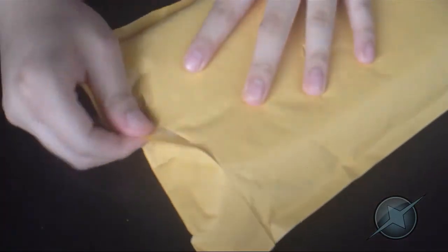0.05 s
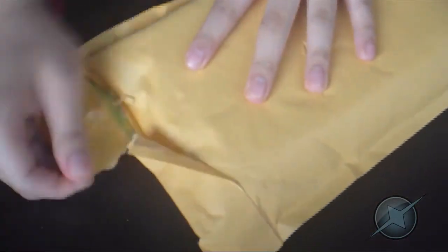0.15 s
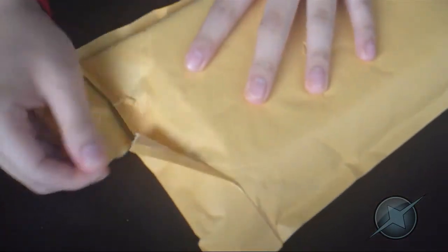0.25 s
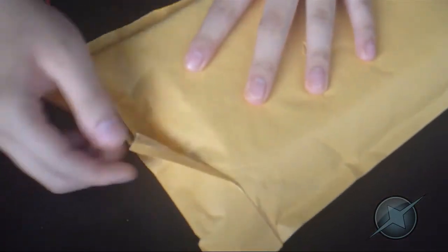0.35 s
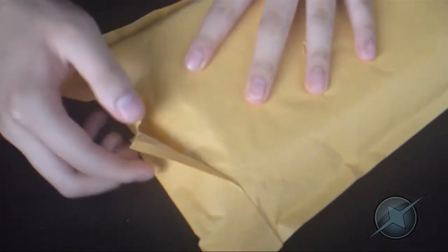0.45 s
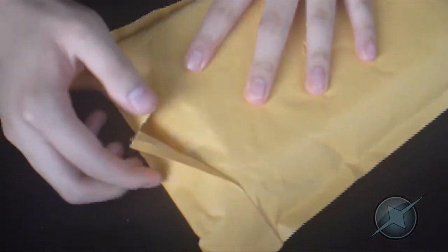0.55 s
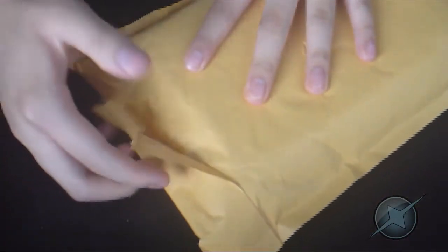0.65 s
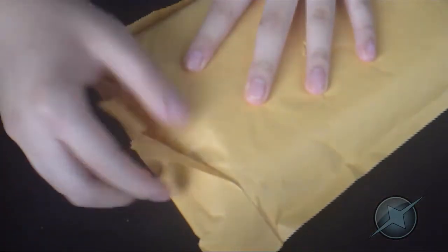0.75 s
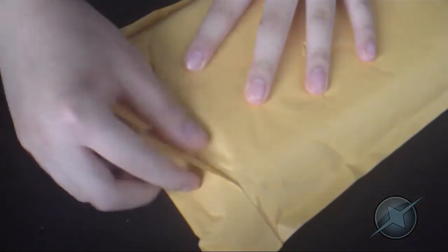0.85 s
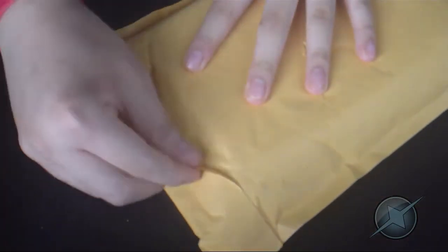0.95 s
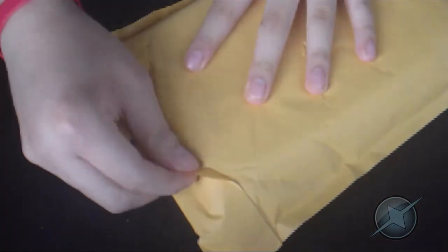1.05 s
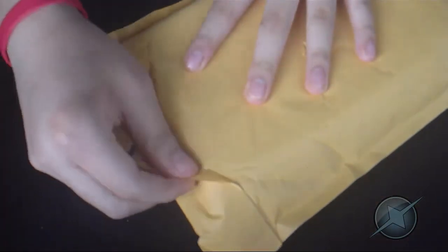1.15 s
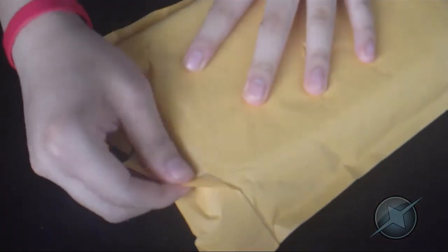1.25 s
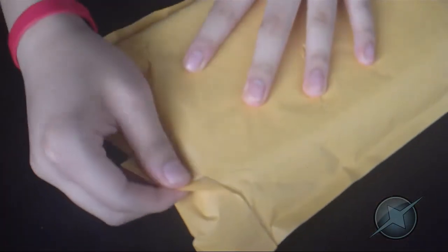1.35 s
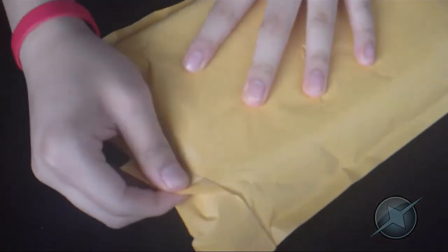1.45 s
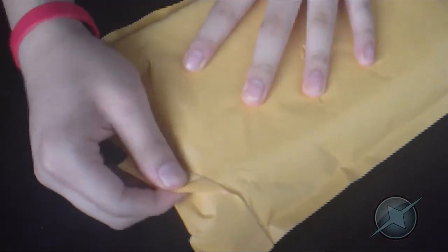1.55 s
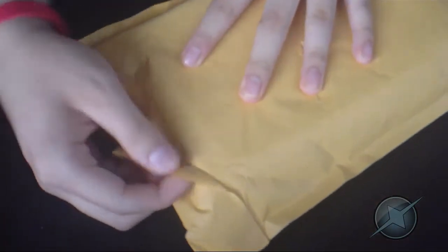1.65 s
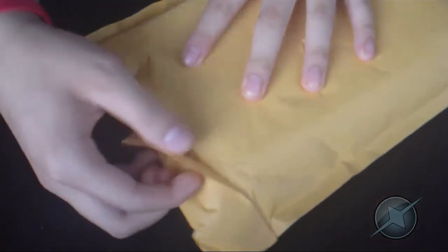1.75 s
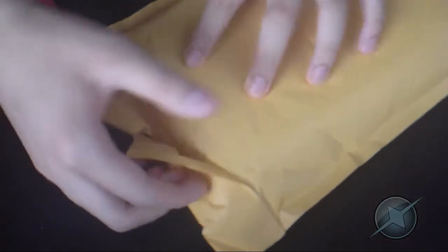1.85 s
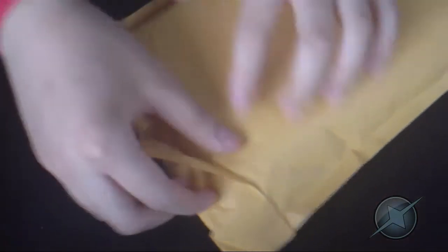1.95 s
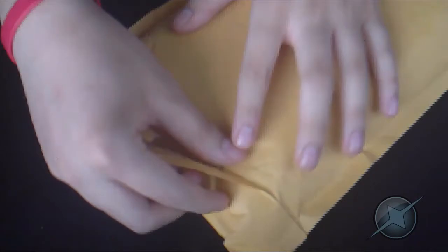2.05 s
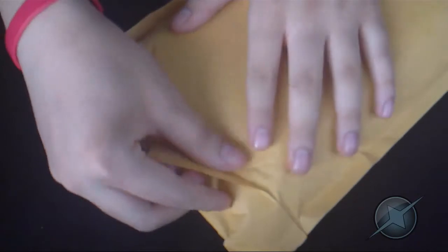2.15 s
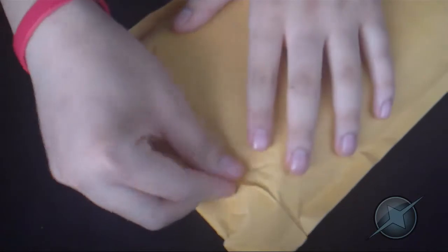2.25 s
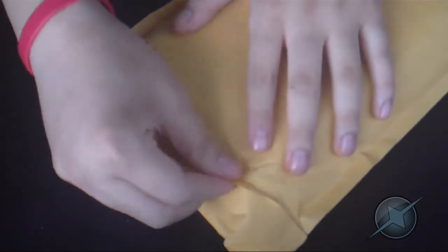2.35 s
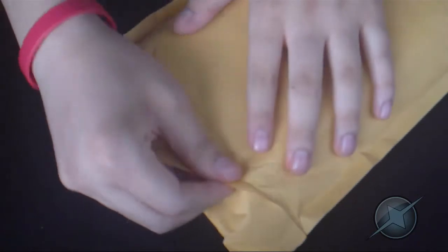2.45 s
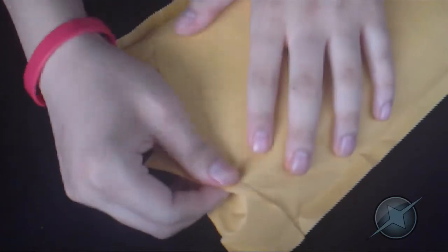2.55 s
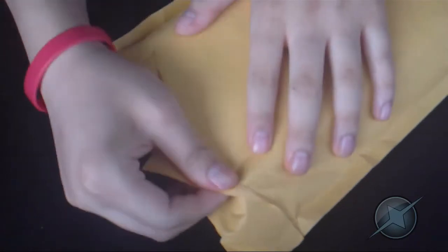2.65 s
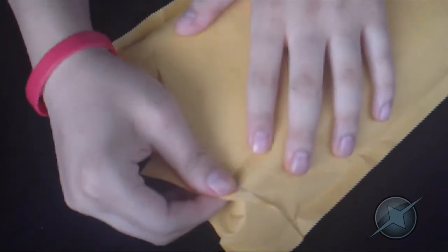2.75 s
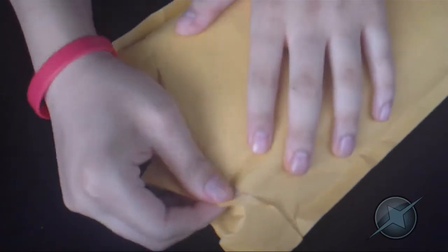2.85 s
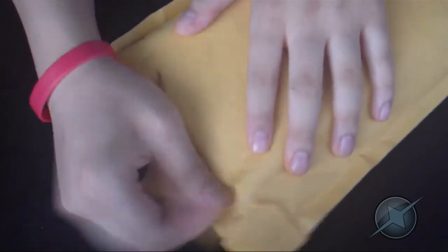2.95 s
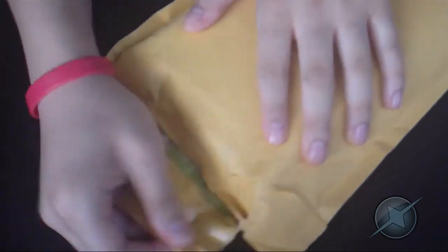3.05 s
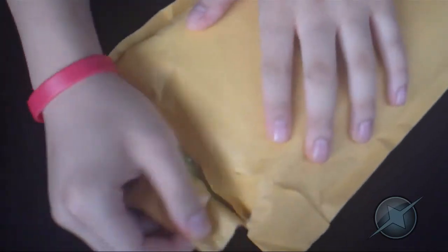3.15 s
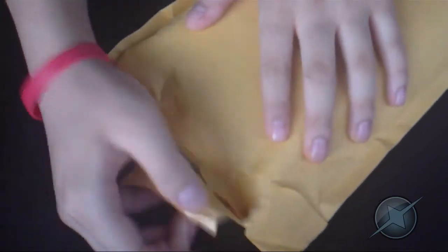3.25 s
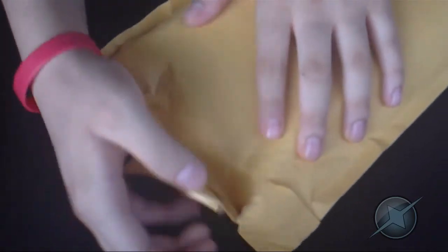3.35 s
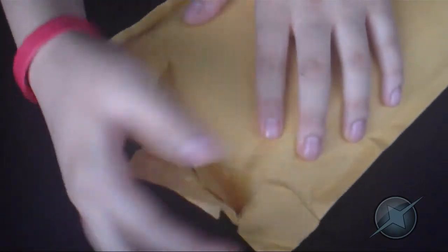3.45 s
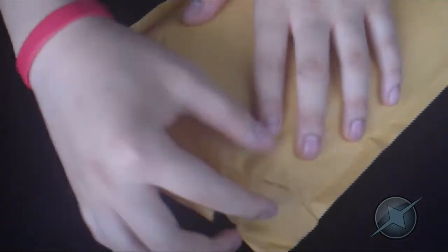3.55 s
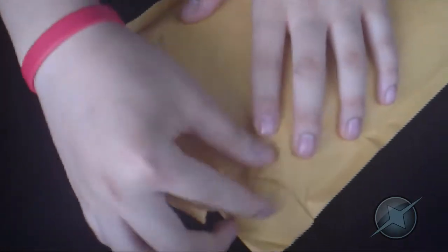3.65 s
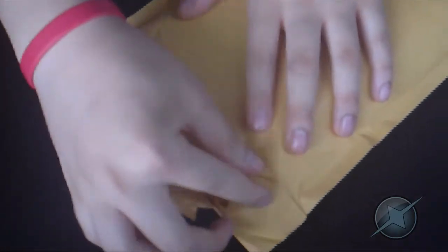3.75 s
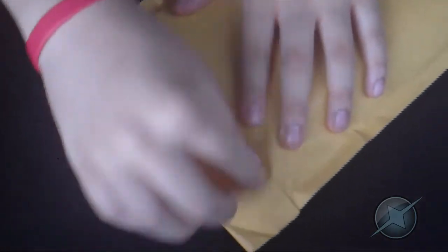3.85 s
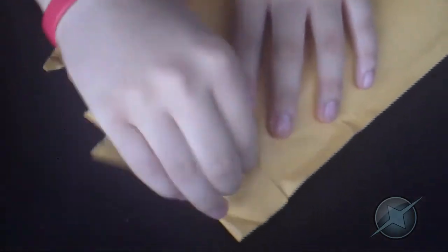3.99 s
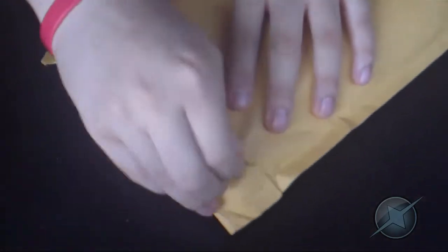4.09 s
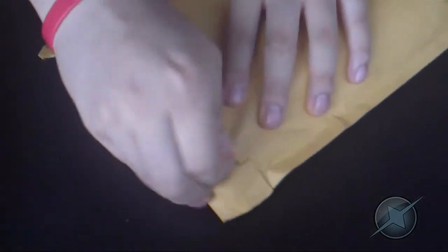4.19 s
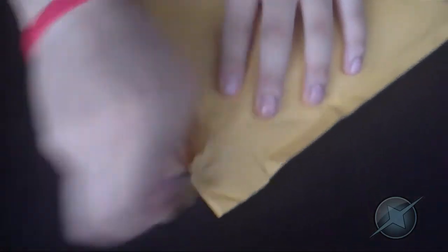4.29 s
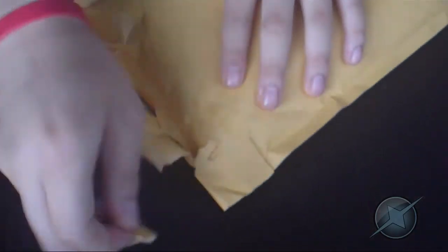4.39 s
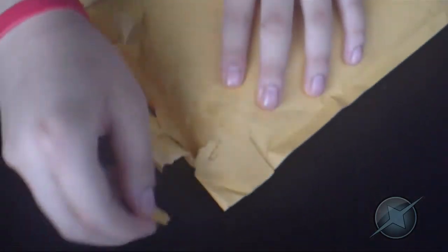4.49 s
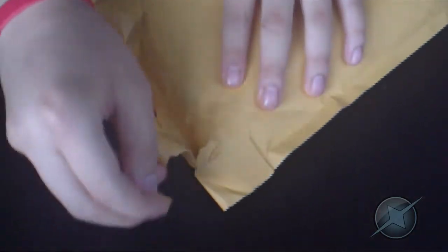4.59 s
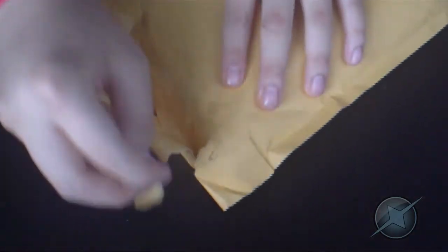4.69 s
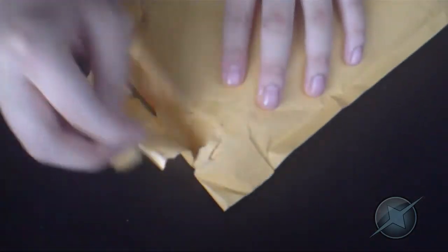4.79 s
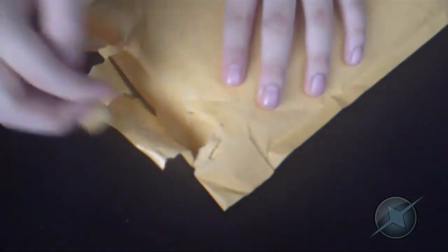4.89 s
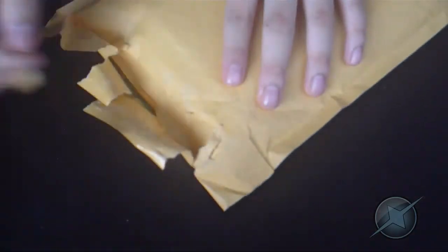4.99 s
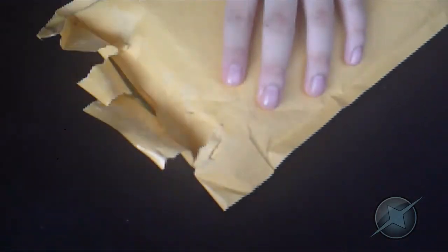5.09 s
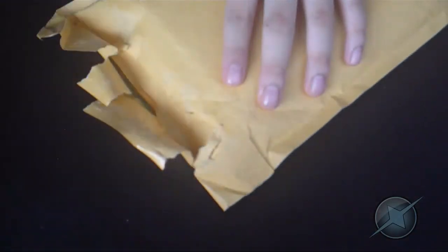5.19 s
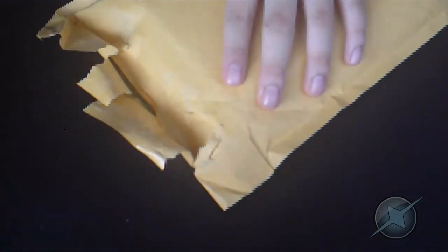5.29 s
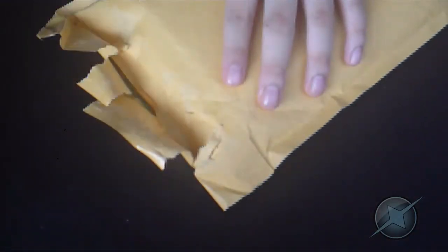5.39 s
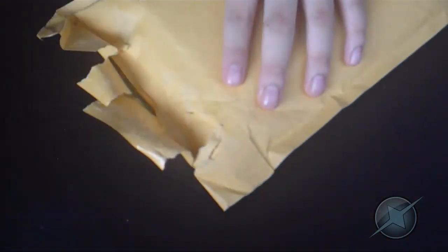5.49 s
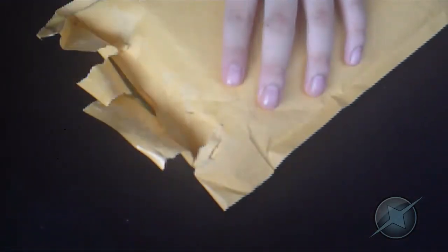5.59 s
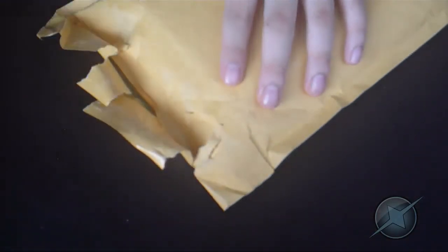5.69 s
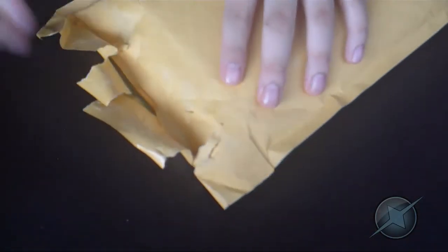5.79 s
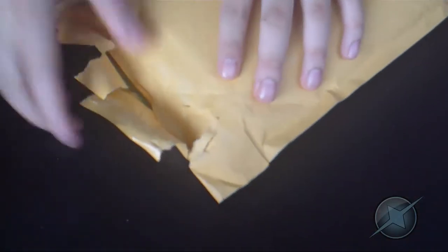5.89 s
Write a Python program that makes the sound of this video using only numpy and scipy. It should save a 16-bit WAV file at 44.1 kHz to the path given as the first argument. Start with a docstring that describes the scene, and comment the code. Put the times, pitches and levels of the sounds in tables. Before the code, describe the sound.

Close to a small microphone in a quiet room, hands tear a padded paper envelope on a desk. A loud rip comes almost at once, then hollow pops, bright snaps and fibre crackle in uneven bouts. Two more hard rips follow around the middle and later, with dull desk thuds. After that, only low hum and soft hiss, with a tiny late crinkle.

```python
"""Padded envelope torn open

A hand tears the flap of a padded paper envelope on a desk in a quiet room, close to a small microphone.
Creases snap: a short hollow pop, a decaying sine that rings the hollow, and a bright crack of noise.
Random clicks make fine fibre crackle, and three fast rips are dense bursts of it. Struck desk modes thud.
Low hum, a steadier tone, hiss and desk rumble lie below; the loudest snaps overload the microphone."""
import sys
import numpy as np
from scipy import signal
from scipy.fft import rfft, irfft
from scipy.io import wavfile

SR = 44100
rng = np.random.default_rng(int(sys.argv[2]) if len(sys.argv) > 2 else 0)


def decibels_to_gain(level_db):
    """Convert a level in decibels to a linear amplitude gain (20 dB per decade)."""
    exponent = np.asarray(level_db, float) / 20
    return 10 ** exponent


def pcm_store(signal):
    """Save signal as 16-bit PCM."""
    levels = np.round(np.clip(np.atleast_2d(signal), -1, 1) * 32767)
    wavfile.write(sys.argv[1], SR, levels.astype(np.int16).T)


N = 261513   # samples


def rms_one(x):
    """Scales to rms 1."""
    return x / np.sqrt(np.mean(x ** 2) + 1e-20)


def colour(x, spectrum):
    """Minimum-phase filter of a spectrum, so nothing sounds before its cause; keeps the power of white noise."""
    hz, db = np.transpose(spectrum)
    grid = np.maximum(np.arange(1025) * SR / 2048, 1)
    cepstrum = irfft(np.log(decibels_to_gain(np.interp(np.log(grid), np.log(hz), db))))
    # folding the cepstrum onto positive time gives minimum phase
    cepstrum[1:1024] *= 2
    cepstrum[1025:] = 0
    kernel = irfft(np.exp(rfft(cepstrum)))
    return signal.fftconvolve(x, kernel / np.sqrt(np.sum(kernel ** 2)))[:N]


def resonance(x, hz, width_hz):
    """Two-pole resonance with gain 1 on top."""
    r = np.exp(-np.pi * width_hz / SR)
    zeros = [(1 - r * r) / 2, 0, (r * r - 1) / 2]
    poles = [1, -2 * r * np.cos(2 * np.pi * hz / SR), r * r]
    return signal.lfilter(zeros, poles, x + 1e-18)


def drift(rate_hz):
    """Slow random wander of rms 1: noise through two equal low-pass poles."""
    r = np.exp(-2 * np.pi * rate_hz / SR)
    wander = signal.lfilter([1], [1, -2 * r, r * r], rng.standard_normal(N + SR))
    return rms_one(wander[SR:])   # the first second lets the filter settle


# low hum bands: (f/Hz, width of each of two passes/Hz, rms level/dB)
HUM_BANDS = [(32, 49, -45), (62.8, 10.7, -47.5), (129.6, 58, -49), (847, 7.4, -92)]


def hum():
    """Wavering hum of distant machines: noise passed twice through each narrow resonance."""
    total = np.zeros(N)
    for hz, width_hz, db in HUM_BANDS:
        once = resonance(rng.standard_normal(N), hz, width_hz)
        total += decibels_to_gain(db) * rms_one(resonance(once, hz, width_hz))
    return total


def whine():
    """One steadier tone of distant machines: a sine whose pitch and level waver a little."""
    hz = 218.3 + 2.0 * drift(13.4)
    level = decibels_to_gain(-51.5 + 0.48 * drift(4.2))   # rms
    return level * np.sqrt(2) * np.sin(2 * np.pi * np.cumsum(hz) / SR)


# shape of the room hiss: (f/Hz, relative level per Hz/dB)
AIR_SPECTRUM = [(140, -44), (240, -5.5), (369, -6.5), (395, -4.5), (997, -9), (1090, -9), (1790, -12.5),
                (13500, -24.5), (14500, -10.5)]


def air():
    """Smooth room hiss: coloured noise at a steady rms level."""
    return decibels_to_gain(-48) * colour(rng.standard_normal(N), AIR_SPECTRUM)


# low modes of the desk, rubbed and struck: (f/Hz, relative level/dB, t60 when struck/s)
DESK_MODES = [(70.4, -1, 0.031), (149, 3.5, 0.082), (245.5, 1.5, 0.073), (370.4, 0.5, 0.081)]


def rumble(crinkle_db):
    """Hands pressing the desk keep its low modes murmuring, more so while the sheet is worked."""
    press_db, press_follows, waver_db = -46, 0.35, 0.5   # rms at a -28.5 dB crinkle; share of its swing; waver
    noise = rng.standard_normal(N)
    # wider resonances than when struck
    low = sum(decibels_to_gain(db) * resonance(noise, hz, 3.68 / t60_s) for hz, db, t60_s in DESK_MODES)
    swing_db = np.maximum(crinkle_db, -60) + 28.5
    return decibels_to_gain(press_db + press_follows * swing_db + waver_db * drift(14.0)) * rms_one(low)


# the envelope slaps the desk: (t/s, relative level/dB)
KNOCKS = [(0.206, -27.5), (0.6775, -25), (0.7, -26), (1.711, -32), (1.8523, -18), (2.0263, -31.5),
          (2.8221, -32.5), (2.964, -31), (3.0413, -13), (3.347, -34), (3.455, -11), (4.311, -22.5),
          (4.3451, -18.5)]


def knocks(thud_db):
    """Each slap strikes the desk modes with strengths of its own, through a soft, dull contact."""
    s, db = np.transpose(KNOCKS)
    strengths_db = rng.normal(0, 1.5, (len(KNOCKS), len(DESK_MODES)))
    blows = np.zeros((len(DESK_MODES), N))
    blows[:, (s * SR).astype(int)] = decibels_to_gain(db + thud_db + strengths_db.T)
    thuds = np.zeros(N)
    for blow, (hz, mode_db, t60_s) in zip(blows, DESK_MODES):
        # the factor undoes the low impulse gain of a narrow resonance
        thuds += decibels_to_gain(mode_db) * SR * t60_s / 6.9 * resonance(blow, hz, 2.2 / t60_s)
    return signal.lfilter([.03], [1, -.97], thuds)


def strokes(rows, rise_db_per_s, sag_db_per_s, fall_db_per_s):
    """Each stroke rises, sags while it lasts and falls away; gives deep body, body, lower and upper treble in dB."""
    grit_db, grit_follows = -5.5, 0.44   # lower treble re body; share of the brightness it follows
    t = np.arange(0, N + 32, 32) / SR
    power = np.full((4, 1), 1e-10)
    for s, length, db, bright_db, hollow_db in rows:
        rise = rise_db_per_s * np.maximum(s - t, 0)
        sag = sag_db_per_s * np.clip(t - s, 0, length)
        fall = fall_db_per_s * np.maximum(t - s - length, 0)
        bands_db = np.array([[hollow_db], [0], [grit_db + grit_follows * bright_db], [bright_db]])
        power = power + decibels_to_gain(2 * (db - rise - sag - fall + bands_db))
    return [np.interp(np.arange(N) / SR, t, 10 * np.log10(p)) for p in power]


def grains(per_s, spread_db, clump_db):
    """Random clicks of very uneven size that come in clumps; power 1 on average."""
    sizes = decibels_to_gain(spread_db * np.minimum(rng.exponential(1, N), 4.0)) * rng.choice([-1, 1], N)
    chance = per_s * decibels_to_gain(clump_db * drift(30.0)) / SR
    return rms_one(sizes * (rng.random(N) < chance))


# resonances of the envelope's hollow: (f/Hz, width/Hz, relative level/dB)
HOLLOW = [(512, 94, -1.5), (771, 95, 0.5), (1180, 350, -1.5), (1340, 125, 4), (1650, 433, -4),
          (1964, 306, -1.5), (3100, 275, -14)]


def hollow(clicks, deep_db, body_db):
    """Each click rings one resonance of the hollow strongly, the others weakly; deep ones open with the pocket."""
    dealt = rng.integers(0, len(HOLLOW), N)
    rings, levels = [], []
    for k, (hz, width_hz, db) in enumerate(HOLLOW):
        share = np.where(dealt == k, 1, .4)
        rings.append((-1) ** k * decibels_to_gain(db) * resonance(clicks * share, hz, width_hz))
        levels.append(decibels_to_gain(deep_db if hz < 1000 else body_db))
    return sum(level * ring for level, ring in zip(levels, rings)) / np.std(sum(rings))


# breaking fibres as the microphone hears them: (f/Hz, relative level per Hz/dB)
TREBLE = [(1410, -8), (2400, 1), (2830, 4), (3080, -0.5), (4350, -3.5), (5020, 2), (6060, -3.5),
          (7590, -1.5), (8180, 0), (10400, -11), (11900, -16), (13600, -12), (14500, -5.5)]


def fibres(deep_db, body_db, low_treble_db, high_treble_db, per_s, spread_db, clump_db):
    """Breaking fibres: clicks ring the hollow; each also ticks in the treble, mostly in one band, over a fine fizz."""
    fizz_share, rub_share = 1.58, 0.58   # fine fizz in the treble and in the hollow
    clicks = grains(per_s, spread_db, clump_db)
    fizz = grains(5000.0, 0.83, 3.0)
    split_hz = 6300   # between lower and upper treble
    edges_hz = [1500, 2700, 4200, split_hz, 8600, 11500, 15500]
    dealt = rng.integers(0, len(edges_hz) - 1, N)
    halves = np.zeros((2, N))
    for k, (low_hz, high_hz) in enumerate(zip(edges_hz, edges_hz[1:])):
        ticks = 1.8 * clicks * np.where(dealt == k, 1, .25)
        ticks += fizz_share * decibels_to_gain(0.95 * drift(13.0)) * fizz
        band = signal.butter(2, [low_hz, high_hz], "band", fs=SR, output="sos")
        halves[int(low_hz >= split_hz)] += signal.sosfilt(band, ticks)
    low, high = (rms_one(colour(half, TREBLE)) for half in halves)
    body = hollow(clicks + rub_share * fizz, deep_db, body_db)
    return body + decibels_to_gain(low_treble_db) * low + decibels_to_gain(high_treble_db) * high


# bouts of crinkling as the fingers work the sheet:
# (t/s, length/s, body level/dB, upper treble re body/dB, deep body re body/dB)
CRINKLES = [(0, 0.15, -34.5, -6, -1), (.1, .05, -41.5, 5.5, -7), (.14, 0.12, -24, -12, -3),
            (.305, 0.016, -33.5, -10, -1), (.42, 0.14, -34.5, -10.5, -4.5), (.61, 0.065, -33.5, -9, -6),
            (.667, 0.0067, -18, -16, 0.5), (.77, 0.079, -39.5, -20, 5.5), (.87, 0.078, -37, -4.5, -1),
            (.935, 0.041, -31.5, -8.5, 2), (1.015, .03, -44, -4, -4), (1.056, 0.012, -26.5, -3, 0.5),
            (1.09, 0.035, -31.5, -3, 1), (1.17, 0.097, -30, -8, -1.5), (1.3, .16, -34.5, -7, 1),
            (1.47, 0.069, -41.5, -0.5, -3), (1.62, 0.12, -34, -14, -4), (1.71, 0.15, -28, -7, -6),
            (1.854, 0.12, -30.5, -14, 0), (2.026, 0.072, -27, -18, -0.5), (2.14, 0.085, -40, -8, 3),
            (2.25, .05, -34.5, -21, 3), (2.296, 0.025, -25.5, -16, -2), (2.373, 0.054, -29.5, -26, 2.5),
            (2.44, 0.023, -31, -10.5, -7), (2.51, 0.013, -21, -21, -14), (2.575, .02, -28.5, -14, -6),
            (2.602, 0.019, -22, -20.5, -0.5), (2.76, 0.097, -30, -10, -3), (2.88, .04, -31, -7.5, -5),
            (2.928, 0.039, -24.5, -4, -1), (3.0, 0.036, -42, -0.5, -5), (3.09, 0.08, -35, -7, -5),
            (3.2, .1, -46, -1, -7), (3.31, 0.1, -29, -16, -1.5), (3.435, 0.041, -26.5, -20, -3.5),
            (3.5, 0.068, -39, -8, -1), (3.6, .06, -47.5, -8, 2), (3.67, 0.038, -32.5, -11, -1.5),
            (3.755, 0.057, -33, -10, -1.5), (3.875, 0.34, -33, -14, -6), (4.1, 0.088, -30, -7.5, -4),
            (4.225, 0.16, -32.5, -3.5, -1), (4.38, .03, -32.5, -6, -1), (4.44, 0.079, -46.5, -5, -3),
            (4.56, 0.1, -51.5, -5, -1), (4.725, 0.044, -43.5, -6, 0.5), (4.82, 0.041, -39.5, -7, -5),
            (5.843, 0.098, -40.5, -12, -5)]


def crinkle_levels():
    """Levels in dB of the four bands as the fingers work the sheet in bouts."""
    return strokes(CRINKLES, rise_db_per_s=1100, sag_db_per_s=19, fall_db_per_s=272)


def crinkles(levels_db):
    """Fine fibre crackle that fills the gaps between the snaps."""
    return fibres(*levels_db, per_s=900.0, spread_db=1.5, clump_db=6.0)


# fast rips: (t/s, length/s, body level/dB, upper treble re body/dB, deep body re body/dB)
RIPS = [(.156, 0.067, -10, -7, 0.5), (3.042, 0.042, -11, -7, -12.5), (4.311, 0.061, -9.5, -6, -3)]


def rips():
    """Dense tearing of many fibres, practically silent outside each stroke."""
    levels_db = strokes(RIPS, rise_db_per_s=4000, sag_db_per_s=57, fall_db_per_s=1200)
    return fibres(*levels_db, per_s=1100.0, spread_db=3.0, clump_db=5.0)


# creases snapping: (t/s, relative level/dB, pop f/Hz, crack re snap level/dB, crack f/Hz)
SNAPS = [(.1564, 4, 1930, -12, 7700), (.1641, -11, 1230, -17, 7600), (.1748, 1.5, 1110, -7, 9100),
         (.1873, 0, 1650, -5, 5150), (.1952, -2, 1430, -7.5, 7600), (.2067, -1, 1340, -7.5, 5800),
         (.2192, -4, 2060, -5, 5260), (.3046, -8, 1220, -28, 3000), (.4227, -33, 1460, -17, 5100),
         (.4694, -28, 1240, 10, 7250), (.5295, -17, 2180, -6.5, 5300), (.6485, -11, 1430, 1, 8300),
         (.6659, 3.5, 1650, -9.5, 5450), (.6749, 4, 780, -9.5, 7700), (.682, -2.5, 495, -14, 5300),
         (.8703, -23, 1110, -7, 7940), (.9738, -18, 820, -13, 8700), (1.0519, -16, 1260, 1.5, 5170),
         (1.0651, -13, 1750, -13, 5300), (1.128, -24, 1800, 6, 9050), (1.15, -28, 1400, 10.5, 5100),
         (1.1902, -9.5, 1610, -21, 9000), (1.2423, -19, 1340, -28, 7700), (1.25, -15.5, 1820, -27, 7200),
         (1.3368, -21, 1400, -1.5, 7300), (1.3588, -16.5, 1400, -8, 8450), (1.3673, -13.5, 1740, -8, 5170),
         (1.3826, -14, 1780, -25, 5300), (1.4129, -11, 1530, -16, 5500), (1.4254, -13, 1800, -20, 7500),
         (1.4347, -18, 1290, 0.5, 9400), (1.451, -22, 1140, -1.5, 9050), (1.6709, -18.5, 1420, -12, 7600),
         (1.7098, -4.5, 1430, -10, 2770), (1.7722, -18, 1300, -10, 7500), (1.81, -18.5, 1240, -7, 7700),
         (1.8534, 2, 1214, -9.5, 5340), (1.9479, -17, 1800, -10, 6750), (1.9587, -15, 1240, -24, 3100),
         (2.0103, -10, 750, -15, 7240), (2.0278, 6.5, 1770, -15.5, 7600), (2.0474, -9, 1180, -3.5, 7460),
         (2.1018, -11, 1000, -17, 7300), (2.144, -24, 1930, -24, 6800), (2.2865, -12.5, 1060, -19, 7600),
         (2.2957, -11, 1610, -8, 3200), (2.309, -7, 1300, -9.5, 5200), (2.3162, -2, 1180, -34.5, 7600),
         (2.3225, -15, 1150, -16, 7800), (2.3476, -6, 1170, -32, 7300), (2.3736, -4, 1110, -36, 2700),
         (2.3811, -6.5, 1260, -35, 2700), (2.3906, -6.5, 1160, -32, 3000), (2.3976, -14, 1180, -29, 7500),
         (2.4023, -10, 1180, -23, 7400), (2.4128, -13, 1270, -15, 7600), (2.4604, -11, 1790, -20, 3100),
         (2.5102, -3, 1080, -35, 2700), (2.5201, -2, 920, -8, 7800), (2.5553, -14, 1300, -6, 3320),
         (2.5836, -20, 1260, -16, 5400), (2.602, .5, 1760, -12.5, 4900), (2.6533, -7, 2000, -17, 2720),
         (2.726, -35.5, 1300, 4.5, 8000), (2.7353, -23.5, 1210, -9, 9200), (2.76, -5, 2170, -19, 2660),
         (2.7737, -26, 2160, -12, 3500), (2.8207, -4, 1750, -10.5, 5080), (2.8819, -15, 1890, -6, 9000),
         (2.9148, -17, 1730, 6, 7640), (2.9293, -5.5, 1720, 2.5, 7300), (2.966, -7.5, 1220, -3.5, 6700),
         (2.9742, -12.5, 1350, 2.5, 13300), (3.0185, -24, 1000, 4, 7600), (3.025, -13, 830, -3, 5370),
         (3.0418, 6, 1110, -6.5, 5040), (3.0571, 13, 2060, -36, 5300), (3.0615, 4, 2000, -20, 5300),
         (3.0805, -9, 735, -20, 5260), (3.082, 4, 2400, -23, 8300), (3.1444, -14, 1630, -11, 2700),
         (3.1737, -16.5, 2160, -21.5, 2700), (3.3251, -10, 1760, -12, 5200), (3.3359, -6, 1900, -9, 2780),
         (3.3427, -9.5, 1640, -9, 2760), (3.3989, -13.5, 1650, -26, 3300), (3.4424, -15, 1460, -19, 2700),
         (3.4548, 2.5, 1420, -11, 4800), (3.4625, 4, 1700, -17, 2870), (3.5359, -19, 1530, -2, 9100),
         (3.5583, -17, 1340, -4.5, 7800), (3.687, -11.5, 1280, -15, 7200), (3.7026, -10.5, 1300, -8, 2680),
         (3.7582, -19.5, 1340, -25, 3200), (3.8948, -19, 1300, -33, 5300), (3.9859, -19, 1550, -7, 8500),
         (4.1092, -10, 565, -7, 5040), (4.1259, -11.5, 1700, -12, 7400), (4.1586, -11.5, 1830, -11, 8400),
         (4.161, -17, 517, -20, 5200), (4.165, -10.5, 1680, -29, 7600), (4.177, -13.5, 522, -5, 5200),
         (4.1895, -16, 595, -3.5, 10700), (4.1985, -13.5, 1480, -8, 5270), (4.2361, -16.5, 1250, -20, 5000),
         (4.297, -17.5, 1300, -7, 5200), (4.3113, 2, 560, -10, 3900), (4.3437, -6, 1340, 2.5, 5800),
         (4.3708, -0.5, 1390, -2.5, 7560), (4.495, -41, 1400, 11, 5940), (4.7414, -29.5, 1440, 2.5, 6750),
         (4.8402, -21, 1490, -5, 6600), (4.8721, -31.5, 2000, 8.5, 7140), (5.701, -32.5, 445, -16, 6400),
         (5.9147, -21.5, 1740, -4.5, 5140)]


def snaps(pop_cycles, pop_db, crack_s, crack_db):
    """A crease flips: a pop of a few cycles with a noisy crack on its front, coloured by the size of the crease."""
    t = np.arange(1300) / SR
    pops, cracks = np.zeros((2, N + len(t)))
    noise = rng.standard_normal((len(SNAPS), len(t)))
    for k, (s, db, hz, crack_share_db, crack_hz) in enumerate(SNAPS):
        start = round(s * SR)
        at = slice(start, start + len(t))
        swell = (1 - np.exp(-t * hz * 4.13)) * decibels_to_gain(-60 * t * hz / pop_cycles)   # falls 60 dB in pop_cycles
        pops[at] += decibels_to_gain(db + pop_db) * swell * np.sin(2 * np.pi * hz * t)
        burst = noise[k] * np.exp(-t / crack_s)
        crack = 0.43 * burst + 1.08 * resonance(burst, crack_hz, 0.053 * crack_hz)
        cracks[at] += decibels_to_gain(db + crack_share_db + crack_db) * crack
    pops = pops[:N]
    ringing = sum(decibels_to_gain(db) * resonance(pops, hz, width_hz) for hz, width_hz, db in HOLLOW)
    return pops + 2.63 * ringing + colour(cracks, TREBLE)   # the hollow rings on


def room(x):
    """One early echo off a near surface and a short diffuse tail, slightly duller than the direct sound."""
    t60_s, tail_db, cut_hz = 0.26, -17, 17640
    echo_s, echo_db = .0095, -16
    t = np.arange(SR // 2) / SR
    tail = rng.standard_normal(len(t)) * decibels_to_gain(-60 * t / t60_s) * (1 - np.exp(-t / 0.00072))
    tail = signal.lfilter(*signal.butter(1, cut_hz, fs=SR), tail)
    tail *= decibels_to_gain(tail_db) / np.sqrt(np.sum(tail ** 2))
    tail[round(echo_s * SR)] += decibels_to_gain(echo_db)
    return x + signal.fftconvolve(x, tail)[:N]


def scene():
    """Paper in the room, over the background; one microphone, channels apart by a faint hiss and a slight waver."""
    levels_db = crinkle_levels()
    paper = crinkles(levels_db) + rips()
    paper += snaps(pop_cycles=6.8, pop_db=-5.0, crack_s=0.0033, crack_db=0.0)
    paper += knocks(thud_db=-6.0)
    body_db = levels_db[1]
    mid = room(paper) + rumble(body_db) + hum() + whine() + air()
    waver = decibels_to_gain(-37) * drift(40.0) * mid
    own_hiss = decibels_to_gain(-69.5) * rng.standard_normal(N)
    side = waver + own_hiss
    return np.array([mid + side, mid - side])


def low_pass(x):
    """Removes everything above the highest recorded frequency."""
    return signal.sosfilt(signal.butter(12, 15260, fs=SR, output="sos"), x)


def record(dry):
    """At the microphone the loudest snaps hit the ceiling; the deepest bass and the top are cut."""
    clipped = np.clip(dry, -.84, .84)
    low_cut = signal.butter(3, 62.5, "high", fs=SR, output="sos")
    top_cut = signal.cheby2(14, 60, 14650, fs=SR, output="sos")   # 60 dB down from 14650 Hz up
    mix = signal.sosfilt(top_cut, signal.sosfilt(low_cut, clipped))
    return low_pass(mix)


dry = scene()
out = record(dry)
pcm_store(out)
```